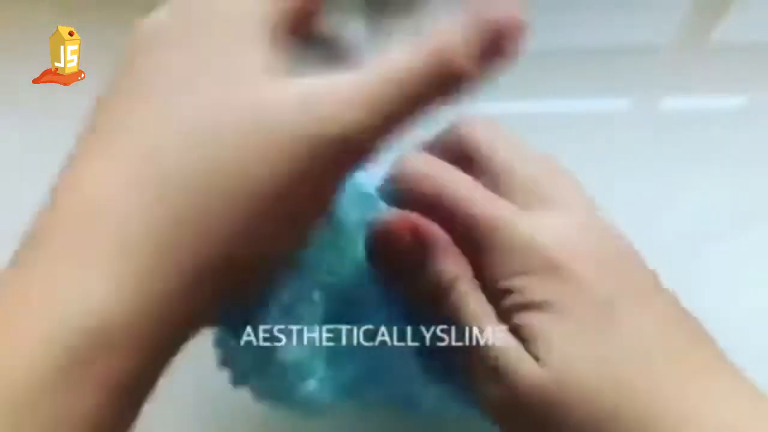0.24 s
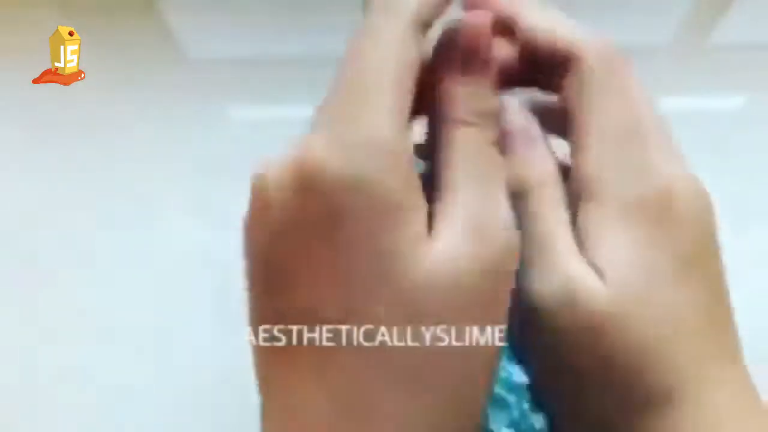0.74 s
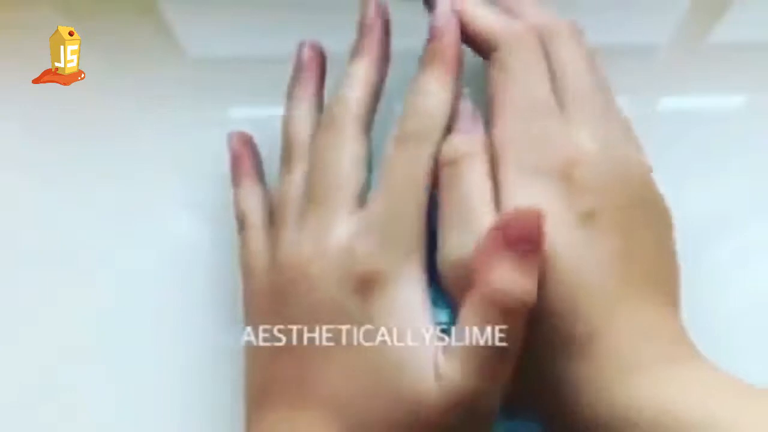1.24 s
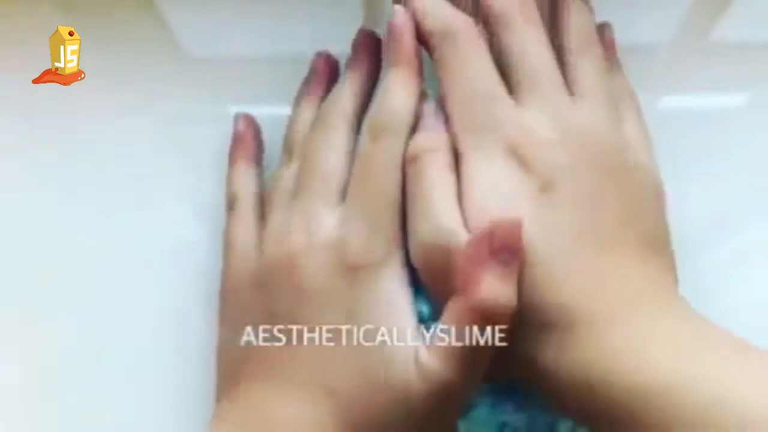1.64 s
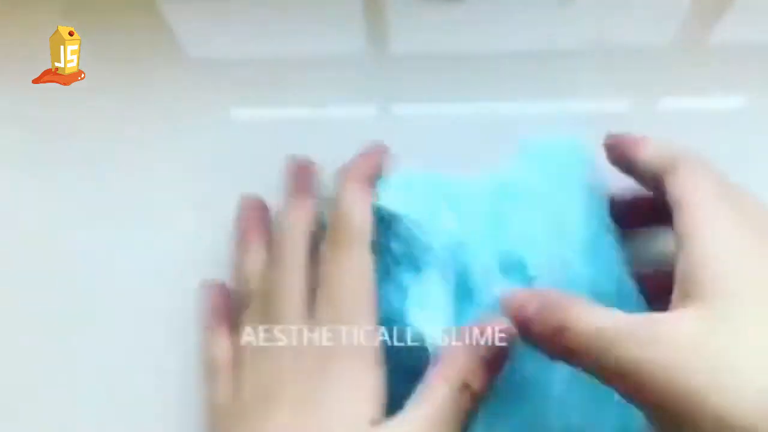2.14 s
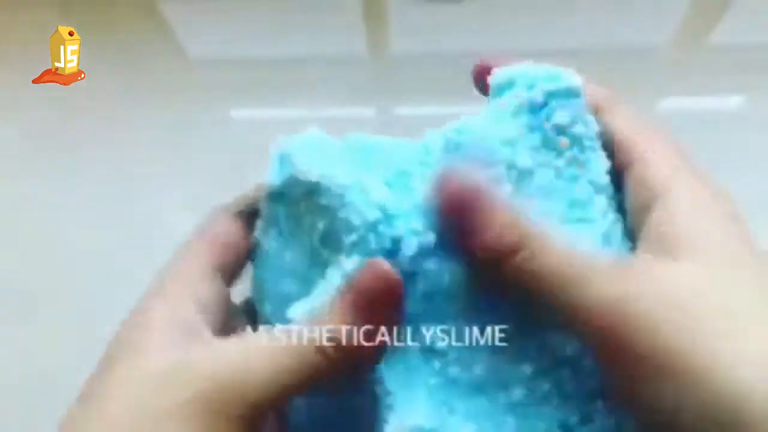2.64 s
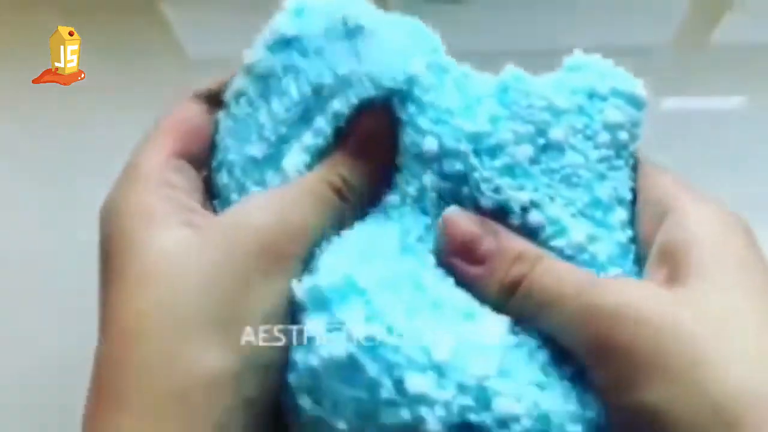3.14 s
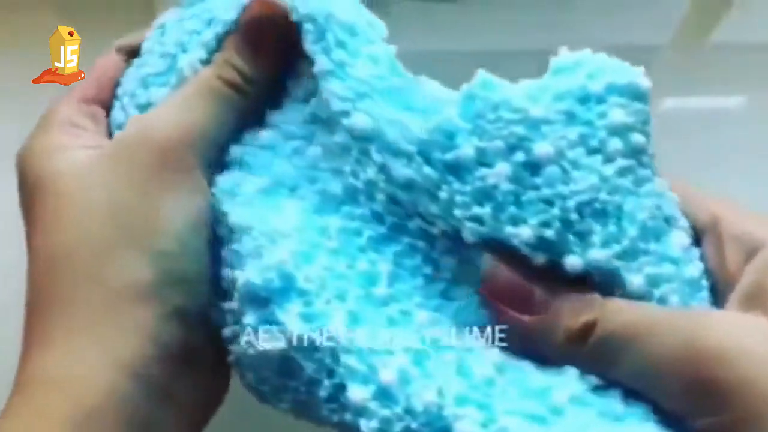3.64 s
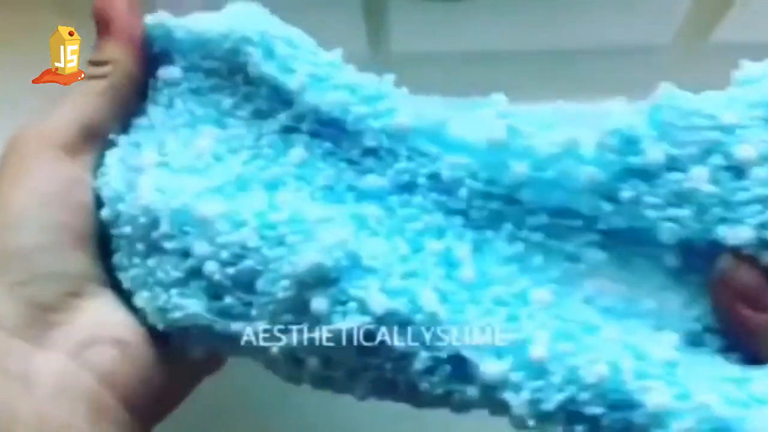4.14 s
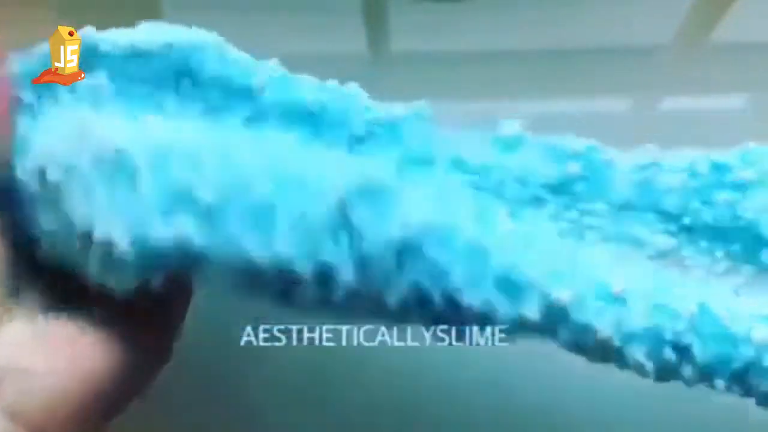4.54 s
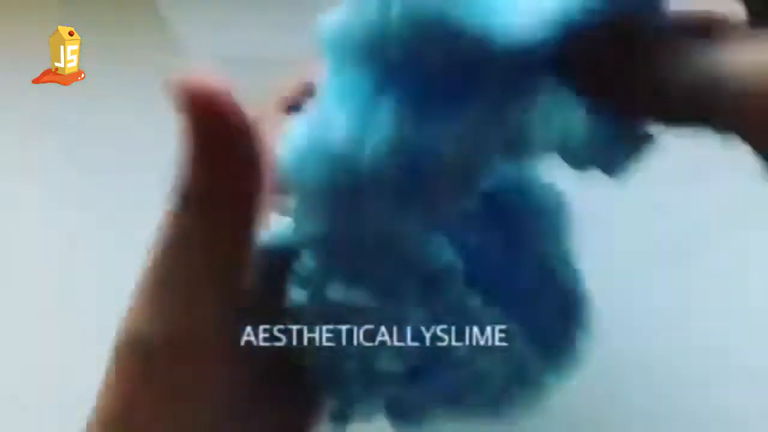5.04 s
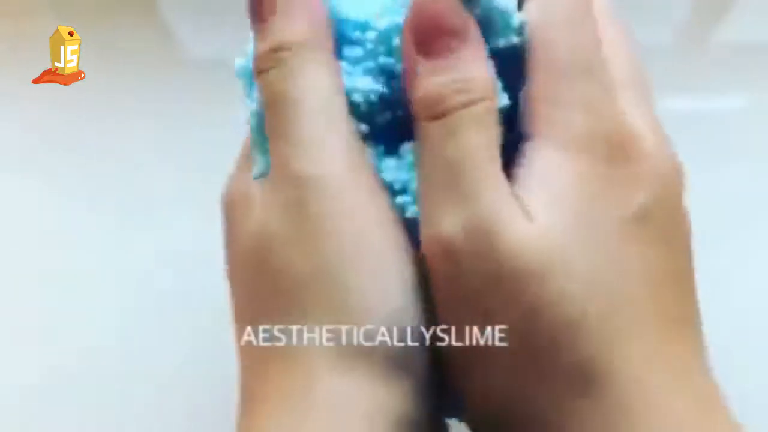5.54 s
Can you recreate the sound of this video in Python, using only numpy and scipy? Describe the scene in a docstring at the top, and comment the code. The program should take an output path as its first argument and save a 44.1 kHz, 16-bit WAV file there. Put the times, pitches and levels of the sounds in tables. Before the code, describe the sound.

Close, bright and mostly dry: thousands of tiny sticky snaps with larger air pockets popping. An early squeeze, a cluster of pops, and a hard gurgling press come first; a soft low rub and bumps follow, then a long crackling stretch, a quieter lull and the loudest squeeze at the end. Short small-room echoes, faint low room tone.

```python
"""Kneading foam-bead slime

Two hands press, knead and stretch a lump of foam-bead slime on a table in a small room.
Snapping films make a fine crackle of short damped sines, and bursting air pockets pop and ring.
Under a hard press the crackle thickens to a fizz and softer bubbles squelch and gurgle.
The table answers with dull knocks and a low stick-slip shudder; echoes and room tone surround it."""
import sys
import numpy as np
from scipy import signal
from scipy.fft import rfft, irfft, next_fast_len
from scipy.io import wavfile
from scipy.ndimage import uniform_filter1d

SR = 44100
rng = np.random.default_rng(int(sys.argv[2]) if len(sys.argv) > 2 else 0)


def dump(signal):
    """Clip the signal to [-1, 1] and save it as 16-bit WAV at the path in sys.argv[1]."""
    limited = np.clip(np.atleast_2d(signal).T, -1, 1)
    pcm = np.round(limited * 32767).astype(np.int16)
    wavfile.write(sys.argv[1], SR, pcm)


N = 255780
T = np.arange(N) / SR   # time of each sample (s)


def from_db(db):
    """Amplitude is exponential in level: 20 dB is a factor of ten."""
    return 10 ** (np.asarray(db) / 20)


def rms_one(x):
    """Normalisation to unit root-mean-square amplitude."""
    return x / np.sqrt(np.mean(x ** 2) + 1e-20)


def drift(rate):
    """Slow random modulation: straight lines join Gaussian knots of spread 1, rate knots a second."""
    knots = rng.standard_normal(4000)
    return np.interp(T * rate, np.arange(len(knots)), knots)


def colour(x, spectrum):
    """Minimum-phase filtering: the folded cepstrum makes the response causal; white noise keeps its power."""
    size = next_fast_len(N + SR // 2) * 2
    hz, db = np.transpose(spectrum)
    bins_hz = np.fft.rfftfreq(size, 1 / SR)
    gain_db = np.interp(np.log(bins_hz + 1), np.log(hz), db)
    gain = rms_one(from_db(gain_db))
    cepstrum = irfft(np.log(gain))[:size // 2]
    cepstrum[1:] *= 2
    response = np.exp(rfft(cepstrum, size))
    return irfft(rfft(x, size) * response)[:N]


def ring(hz, cycles, rise=0.0):
    """Damped resonance: a sine of peak 1 falls 60 dB in cycles / hz seconds; rise bends its pitch up."""
    life_s = cycles / hz
    age = np.arange(int(life_s * SR) + 2) / (life_s * SR)
    wave = np.sin(2 * np.pi * cycles * age * (1 + rise * age)) * from_db(-60 * age)
    return wave / np.abs(wave).max()


def add(out, s, wave):
    """Superposition: a short sound is summed in at time s."""
    i = int(s * SR)
    out[i:i + len(wave)] += wave[:N - i]


def grains(per_s, spread_db, low_hz, high_hz, cycles, clump_db):
    """Random-arrival noise: clumps of damped sines, a few large, each at its own pitch; local rms near 1."""
    at = np.flatnonzero(rng.random(N) < per_s / SR)
    size, place, sign = rng.random((N, 3))[at].T
    height_db = -spread_db * np.log(size + .015) + (clump_db * drift(170))[at]
    height = from_db(height_db) * np.sign(sign - .5)
    period = SR / (low_hz + (min(high_hz, SR / 3) - low_hz) * place)   # in samples
    length = (cycles * period).astype(int)
    # all grains laid end to end: the owner of each sample and its age within that grain
    which = np.repeat(np.arange(len(at)), length)
    age = np.arange(len(which)) - (np.cumsum(length) - length)[which]
    decay = from_db(-60 * age / length[which])
    waves = height[which] * np.sin(2 * np.pi * age / period[which]) * decay
    out = np.bincount(at[which] + age, waves, N)[:N]
    local_power = uniform_filter1d(out ** 2, int(.05 * SR)).clip(0)
    return out / np.sqrt(local_power + 1e-6)


def swell(peak, rise, fall):
    """Raised-cosine envelope: a smooth rise and fall of height 1."""
    return np.cos(np.pi / 2 * np.clip((T - peak) / np.where(T < peak, rise, fall), -1, 1)) ** 2


# spectral shape of the quiet room: pitch_hz [Hz], relative_db [dB per Hz]
ROOM_SPECTRUM = [(20, -38), (30, -23), (44, 4.5), (60, -0.5), (85, 2), (115, -4), (150, -1), (250, -8),
                 (450, -15), (1000, -18), (3000, -20), (14000, -21.5)]
ROOM_TONE_DB = -59   # rms level


def room_tone():
    """Stationary background noise: white noise is coloured by the room's spectrum."""
    return from_db(ROOM_TONE_DB) * colour(rng.standard_normal(N), ROOM_SPECTRUM)


# steady pull on the lump: start_s [s], level_db [dB, crackle before gain and unevenness]
PULL = [(0.0, -59.5), (0.52, -54.5), (0.92, -46), (1.11, -43.5), (1.73, -49), (1.84, -58), (2.08, -67),
        (2.21, -55.5), (2.62, -48.5), (2.78, -48), (3.25, -39), (4.1, -47), (4.3, -48.5), (4.7, -49.5),
        (5.02, -52.5), (5.22, -57), (5.57, -43.5), (5.8, -34.5)]
# the hands ease off: deepest_s [s], fade_s [s], recovery_s [s], dip_db [dB taken from the pull]
EASING_OFF = [(1.53, 0.071, 0.056, 9.5), (1.951, 0.072, 0.097, 28), (2.51, 0.1, 0.11, 13.5),
              (3.62, 0.077, 0.026, 1), (3.79, 0.045, 0.049, 4.5), (4.33, 0.12, 0.11, 4),
              (5.13, 0.046, 0.038, 11), (5.26, 0.057, 0.11, 5), (5.461, 0.11, 0.077, 5.5)]
# single squeezes of palms or fingers:
# peak_s [s], rise_s [s], fall_s [s], crackle_db [dB], squelch_db [dB], pressure [0-1]
PRESSES = [(.04, 0.084, 0.16, -53, -60.5, 0.07), (0.217, .11, 0.091, -40.5, -46, 0.45),
           (.42, .09, 0.12, -56.5, -65.5, 0.02), (.735, 0.086, 0.072, -49.5, -52, 0.21),
           (1.045, 0.027, 0.085, -43, -55.5, 0), (1.16, 0.058, 0.077, -49, -49.5, 0.07),
           (1.31, .10, 0.098, -59, -55.5, 0.08), (1.722, 0.14, 0.14, -31.5, -47.5, 0.98),
           (1.81, 0.065, 0.079, -34.5, -45.5, .6), (2.19, 0.26, 0.11, -49, -58.5, 0.16),
           (2.301, 0.031, 0.035, -45.5, -53.5, 0), (2.413, 0.035, 0.047, -50.5, -55, 0.22),
           (3.34, 0.046, 0.037, -43, -62, 0.08), (3.53, 0.036, 0.069, -41.5, -66, 0.01),
           (3.96, 0.25, 0.19, -40, -63.5, 0.05), (4.212, 0.032, 0.038, -38, -73, 0),
           (4.52, .08, 0.054, -46, -52.5, 0.06), (4.61, 0.051, 0.085, -47.5, -52.5, 0.16),
           (4.77, 0.11, 0.087, -43.5, -54.5, 0.13), (4.908, 0.036, 0.077, -52.5, -54.5, 0.18),
           (5.205, 0.033, 0.024, -47, -57, 0.12), (5.37, 0.06, 0.14, -47, -54.5, 0.08),
           (5.538, .07, 0.21, -53, -53, 0), (5.635, 0.076, 0.097, -32.5, -45.5, 0),
           (5.73, 0.062, 0.15, -33.5, -51.5, 0)]
UNEVEN_DB, UNEVEN_PER_S = 3, 25   # the slime gives way in fits: spread, knots per second
PULL_CRACKLE_DB = -.5   # gain of the crackle under the pull
SQUELCH_SHARE, PULL_SQUELCH_DB = 0.58, -35   # share of the pull's level in dB, and the offset added


def kneading():
    """Power summation: an uneven pull, lapsing as hands ease off, joins squeezes in crackle and squelch."""
    pull_db = np.interp(T, *np.transpose(PULL))
    pull_db = pull_db + UNEVEN_DB * drift(UNEVEN_PER_S)
    for *times, dip_db in EASING_OFF:
        pull_db = pull_db - dip_db * swell(*times)
    crackle = from_db(pull_db + PULL_CRACKLE_DB)
    squelch = from_db(SQUELCH_SHARE * pull_db + PULL_SQUELCH_DB)
    pressing = 0
    for *times, crackle_db, squelch_db, pressure in PRESSES:
        shape = swell(*times)
        crackle = np.hypot(crackle, from_db(crackle_db) * shape)
        squelch = np.hypot(squelch, from_db(squelch_db) * shape)
        pressing = pressing + np.clip(pressure, 0, 1) * shape
    return 20 * np.log10(crackle), 20 * np.log10(squelch), pressing


# spectral shape of the snapping films: pitch_hz [Hz], relative_db [dB per Hz]
CRACKLE_SPECTRUM = [(300, -77), (700, -24.5), (1200, -29), (2000, -16.5), (3200, -4), (5000, -1.5),
                    (7000, 1), (9000, 2.5), (10500, 3), (12500, 7.5), (14000, 5.5)]


def beads(crackle_db, pressing):
    """Adhesive failure: sticky films snap by the thousand; pressing makes them denser and evener, a fizz."""
    per_s = 3400 * (1 + 2 * pressing)
    clump_db = 3.0 * (1 - .4 * pressing)
    snaps = grains(per_s, spread_db=3.9, low_hz=900, high_hz=14500, cycles=9, clump_db=clump_db)
    return from_db(crackle_db) * rms_one(colour(snaps, CRACKLE_SPECTRUM))


# spectral shape of bubbles inside the lump: pitch_hz [Hz], relative_db [dB per Hz]
SQUELCH_SPECTRUM = [(150, -29), (350, 0), (480, -19), (555, 0.5), (640, -10.5), (800, -5), (1050, -0.5),
                    (1250, 5), (1480, 1.5), (1800, 3.5), (2600, 4), (5000, 1), (10000, -62)]
# spectral shape of air forced out from under the palms: pitch_hz [Hz], relative_db [dB per Hz]
GURGLE_SPECTRUM = [(50, -20), (130, -1), (300, -4), (550, 3.5), (850, -4), (1400, -4), (2000, -8)]
GURGLE_DB = -47.5   # level at a pressure of 1


def wet_slime(squelch_db, pressing):
    """Bubble resonance: larger, softer bubbles burst inside the lump; pressure makes lower ones gurgle."""
    bubbles = grains(per_s=1000, spread_db=2.0, low_hz=400, high_hz=3200, cycles=24, clump_db=1.5)
    pockets = grains(per_s=1100, spread_db=1.8, low_hz=120, high_hz=1700, cycles=14, clump_db=1.2)
    squelch = from_db(squelch_db) * rms_one(colour(bubbles, SQUELCH_SPECTRUM))
    gurgle = from_db(GURGLE_DB) * pressing * rms_one(colour(pockets, GURGLE_SPECTRUM))
    return squelch + gurgle


# spectral shape of the echoes: pitch_hz [Hz], relative_db [dB per Hz]
ECHO_SPECTRUM = [(300, -41.5), (700, -11), (1200, -3), (2000, -6), (3500, 2.5), (8000, 3), (14000, -5)]


def reflections(x, t60, level_db):
    """Diffuse decay: noise follows the smeared power; its pattern keeps changing as hands and lump move."""
    keep = from_db(-120 / (t60 * SR))   # power left after one sample: 60 dB down in t60 seconds
    power = signal.lfilter([0, 1 - keep], [1, -keep], x ** 2 + 1e-18)
    return from_db(level_db) * np.sqrt(power) * colour(rng.standard_normal(N), ECHO_SPECTRUM)


# larger air pockets bursting, levels before filtering: start_s [s], snap_db [dB peak], snap_hz [Hz],
# cavity_hz [Hz, at onset], cavity_db [dB peak], beads_db [dB, before the loosened beads' gain]
POCKETS = [(0.0475, -27.5, 4240, 2550, -64, -36), (0.255, -16, 7200, 2290, -50.5, -30.5),
           (0.2818, -27, 3720, 2730, -54, -32), (0.3617, -33, 3100, 1240, -38, -40),
           (0.8109, -20.5, 8180, 2710, -54, -37), (0.9114, -32, 3780, 2590, -53, -30.5),
           (0.9401, -17.5, 3760, 2950, -24, -24.5), (1.0343, -20.5, 5770, 1330, -52, -32),
           (1.1182, -24, 5650, 2350, -35, -28.5), (1.1378, -14.5, 7000, 1560, -23.5, -21.5),
           (1.2187, -17, 9680, 2800, -27.5, -27), (1.3037, -26, 5290, 1990, -35, -31),
           (1.3181, -19, 3680, 2750, -26, -31), (1.355, -21, 4620, 1680, -37, -25.5),
           (1.4325, -24, 7360, 2800, -53, -29.5), (1.4895, -24.5, 3000, 2790, -41, -37),
           (1.5174, -29, 4220, 2310, -56, -42), (1.5486, -27, 5890, 1690, -41, -47),
           (1.7273, -15.5, 4030, 1730, -43, -29.5), (2.3057, -25, 7000, 2200, -56, -40),
           (2.4112, -22, 8800, 1380, -46, -43), (2.6247, -16, 9900, 2030, -62, -41),
           (2.7734, -22.5, 8800, 1570, -47, -45), (2.8063, -18, 7400, 1290, -38.5, -38),
           (2.8967, -24.5, 6840, 1230, -53, -31), (2.944, -13.5, 9700, 1210, -42, -34),
           (3.0544, -12, 9400, 2300, -60, -33.5), (3.1123, -17.5, 10000, 1180, -49, -42),
           (3.1495, -27, 7100, 1250, -34.5, -26.5), (3.198, -21, 6900, 2540, -46, -30),
           (3.2226, -11, 6600, 2630, -57, -26.5), (3.257, -18, 7050, 2300, -52, -35),
           (3.3433, -10.5, 8800, 2640, -25, -27), (3.3681, -12.5, 9400, 2570, -52, -32),
           (3.476, -19, 8610, 2790, -47, -32), (3.5321, -13, 7800, 2780, -48, -26),
           (3.561, -12.5, 9640, 2010, -52, -32), (3.584, -15, 9360, 1380, -56, -30),
           (3.7201, -10.5, 6740, 2690, -56, -25), (3.7323, -21.5, 5900, 2710, -54, -31),
           (3.82, -17, 9100, 2400, -53, -34), (3.831, -23, 8200, 2060, -42, -33),
           (3.8505, -16.5, 9420, 2660, -49, -34), (3.9732, -12, 8950, 1620, -32, -32),
           (3.9834, -29, 4160, 1210, -28, -28), (4.02, -33, 4750, 2280, -44, -27),
           (4.0327, -15.5, 6900, 2650, -58, -34.5), (4.0877, -20, 7100, 2550, -56, -45),
           (4.139, -10.5, 9380, 2740, -58, -26.5), (4.2771, -11, 10300, 2160, -29, -26),
           (4.4553, -19, 7600, 2620, -56, -33.5), (4.802, -20, 10800, 1830, -56, -38),
           (5.0904, -28.5, 5700, 1310, -36.5, -34), (5.1777, -21, 6540, 1240, -36.5, -31),
           (5.2851, -24.5, 5850, 1390, -64, -40), (5.5781, -23, 8930, 1410, -43, -29),
           (5.6189, -15, 6250, 2730, -47, -23), (5.713, -8, 9120, 2340, -43, -23),
           (5.7405, -3.5, 9200, 1290, -28, -22), (5.748, -13.5, 5510, 2300, -38, -27),
           (5.76, -7, 8980, 2690, -46, -37), (5.7916, -13, 4660, 2360, -45, -39)]
# loosened beads start to slip just before the tear and settle after it
LOOSENED_RISE_S, LOOSENED_S, LOOSENED_DB = 0.0016, 0.0027, -7   # time constants, gain
SNAP_LOW_HZ = 2580   # the small film radiates little below this


def pops():
    """Impulsive excitation: the film tears with a snap, the cavity rings and neighbouring beads let go."""
    snaps, cavities, loosened = np.zeros((3, N))
    bounce_s = rng.uniform(.0005, .0014, len(POCKETS))
    since = np.arange(-.01, .04, 1 / SR)   # seconds from the tear
    slipping = np.exp(-np.abs(since) / np.where(since < 0, LOOSENED_RISE_S, LOOSENED_S))
    for (s, snap_db, snap_hz, cavity_hz, cavity_db, beads_db), lag in zip(POCKETS, bounce_s):
        snap = from_db(snap_db) * ring(snap_hz, cycles=5.5)
        overtone = from_db(snap_db - 19) * ring(min(1.4 * snap_hz, SR / 3), cycles=26)
        add(snaps, s, snap)
        add(snaps, s, overtone)
        add(snaps, s + lag, from_db(-4) * snap)   # its bounce off the table top
        add(cavities, s, from_db(cavity_db) * ring(cavity_hz, cycles=14.6, rise=0.12))
        add(loosened, s + since[0], from_db(beads_db) * slipping)
    rustle = grains(per_s=7000, spread_db=2.5, low_hz=2000, high_hz=14000, cycles=5, clump_db=1)
    snaps = signal.sosfilt(signal.butter(2, SNAP_LOW_HZ, "high", fs=SR, output="sos"), snaps)
    burst = snaps + cavities + from_db(LOOSENED_DB) * loosened * rustle
    # pockets this small radiate hardly any bass
    return signal.sosfilt(signal.butter(3, 950, "high", fs=SR, output="sos"), burst)


# hands and lump bumping the table: start_s [s], level_db [dB peak, before filtering], pitch_hz [Hz]
KNOCKS = [(0.208, -43, 160), (0.223, -39, 172), (0.233, -37, 140), (0.268, -45, 190), (1.389, -46.5, 99),
          (1.951, -38, 205), (1.994, -44, 209), (2.111, -39.5, 108), (2.129, -33, 178), (2.418, -41.5, 116),
          (2.752, -42.5, 146)]
# the lump dragging on the table: start_s [s], level_db [dB, before gain and filtering]
DRAGGING = [(1.8, -47), (1.816, -62), (1.892, -42), (1.948, -60), (2.006, -43), (2.096, -53.5),
            (2.158, -45), (2.246, -74), (2.26, -86)]
SHUDDER_DB = -1   # gain of the shudder


def table():
    """Stick-slip and impact: a low wavering shudder under the dragged lump, and dull knocks of soft flesh."""
    drag_db = np.interp(T, *np.transpose(DRAGGING), left=-np.inf, right=-np.inf)
    shudder_hz = 87 * (1 + 0.049 * drift(24.9))
    shudder = np.sqrt(2) * np.sin(2 * np.pi * np.cumsum(shudder_hz) / SR)   # rms 1
    out = from_db(drag_db + SHUDDER_DB) * shudder
    for s, level_db, pitch_hz in KNOCKS:
        add(out, s, from_db(level_db) * ring(pitch_hz, cycles=4.9))
    return signal.sosfilt(signal.butter(2, [50, 330], "band", fs=SR, output="sos"), out)


def scene():
    """Superposition of the slime, its near and far echoes, the table and the quiet room."""
    crackle_db, squelch_db, pressing = kneading()
    slime = beads(crackle_db, pressing) + wet_slime(squelch_db, pressing) + pops()
    hands_and_table = reflections(slime, t60=.014, level_db=-7)
    room = reflections(slime, t60=.12, level_db=-12)
    return (slime + hands_and_table + room + table() + room_tone())[None]


CUTOFF_HZ = 14200


def record(dry):
    """Linear-phase low-pass filtering: the top is cut steeply, without smearing the snaps."""
    lowpass = signal.firwin(201, CUTOFF_HZ, fs=SR, window="blackman")
    return signal.oaconvolve(dry, lowpass[None], "same", axes=1)


dry = scene()
out = record(dry)
dump(out)
```